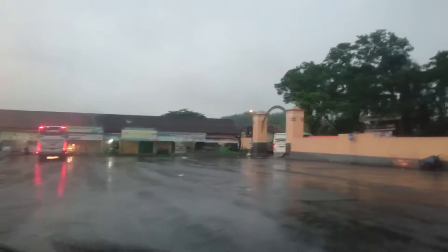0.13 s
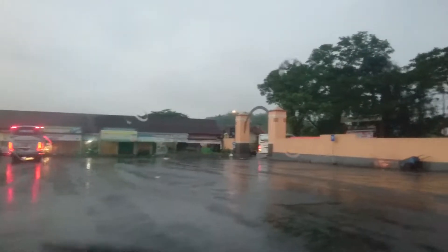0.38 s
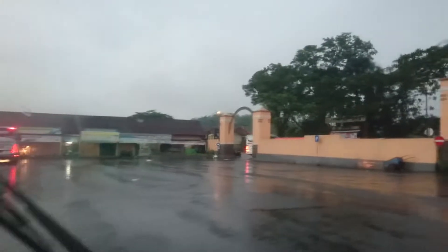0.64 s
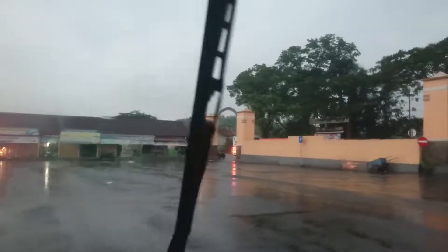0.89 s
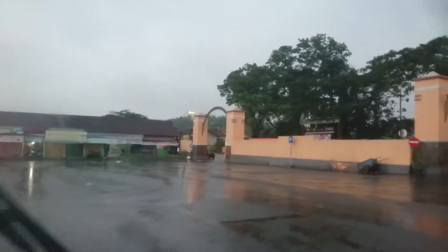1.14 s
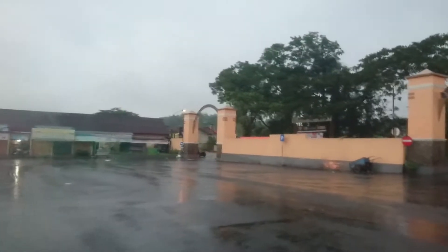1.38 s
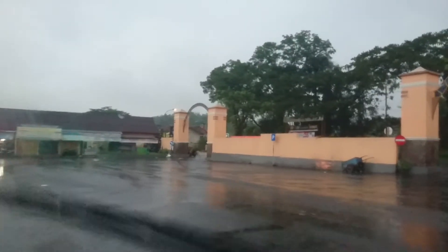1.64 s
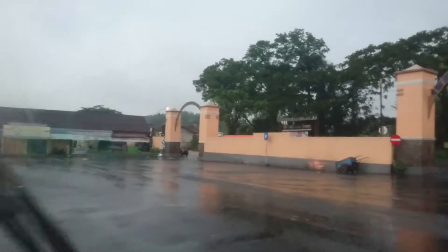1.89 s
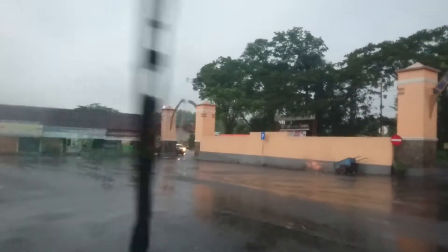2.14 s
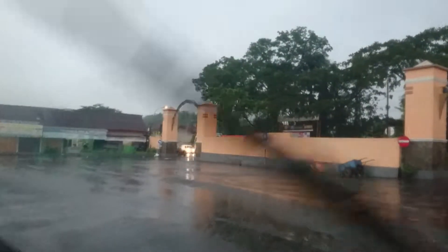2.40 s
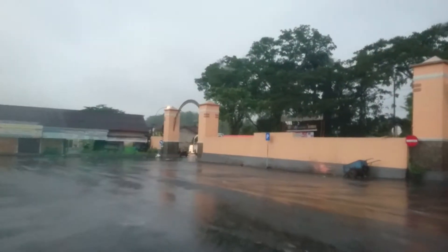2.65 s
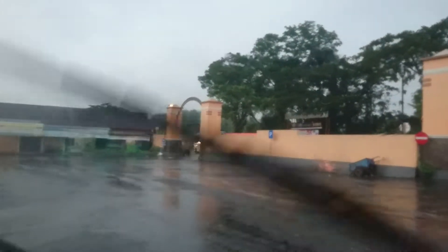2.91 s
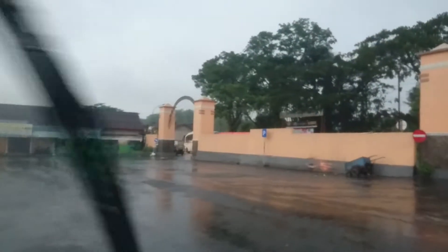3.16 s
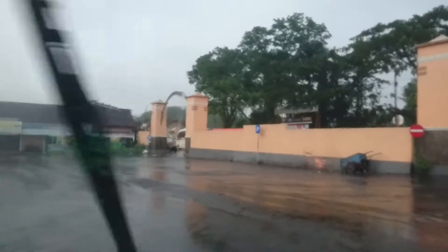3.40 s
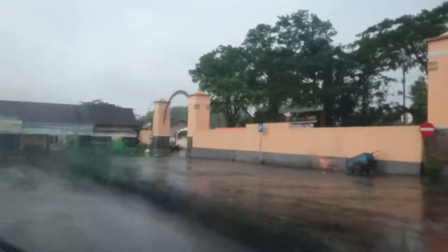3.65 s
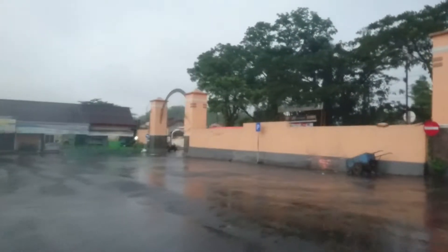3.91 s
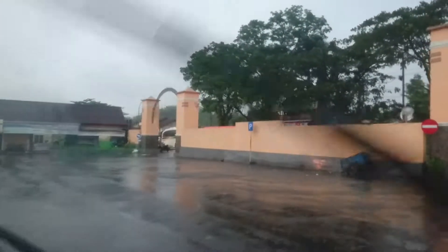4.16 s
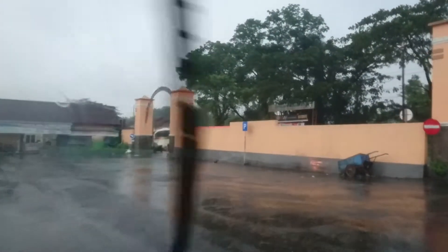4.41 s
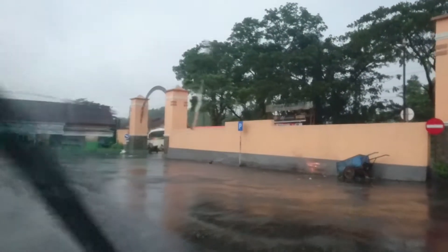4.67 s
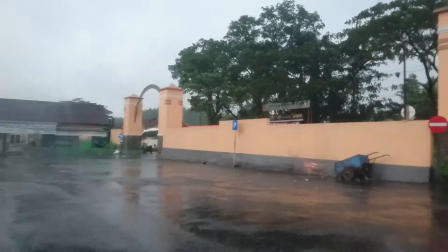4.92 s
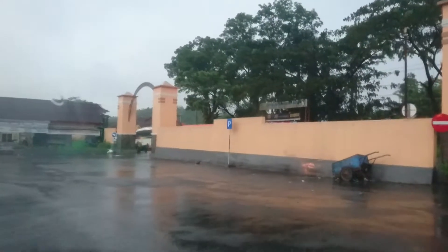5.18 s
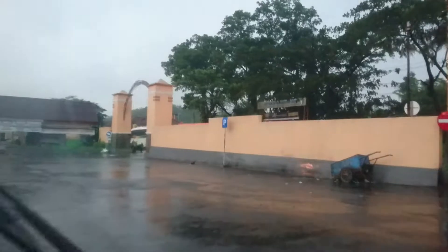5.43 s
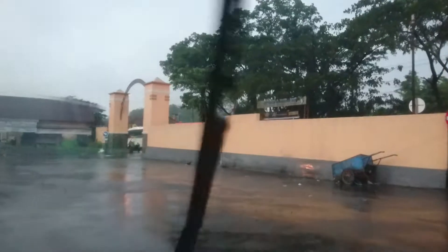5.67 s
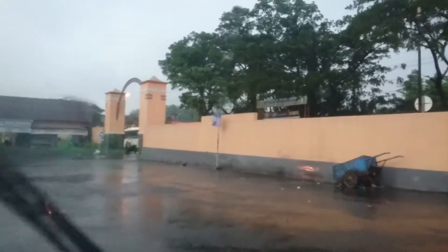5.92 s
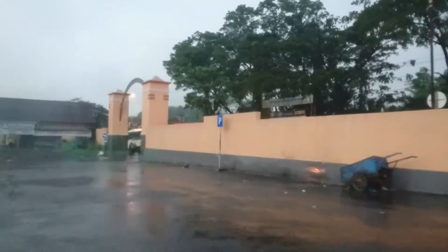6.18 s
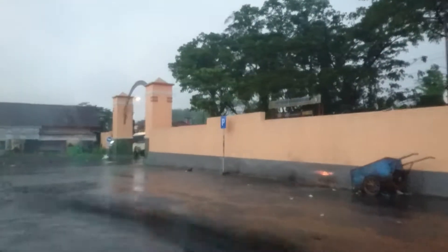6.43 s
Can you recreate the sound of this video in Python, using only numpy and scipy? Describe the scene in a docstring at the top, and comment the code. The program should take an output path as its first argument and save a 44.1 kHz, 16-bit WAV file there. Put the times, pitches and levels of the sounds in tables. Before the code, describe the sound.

A phone inside a car picks up bass-heavy rumble, swelling in irregular surges, and fine steady rain behind it. Wiper blades go back and forth about every 1.2 seconds, landing with dull thuds and light rubber stutters. The engine pulls gently at first and drops away. Later come thin, broken brake squeals, mostly on the left, a heavier thud and scattered drop ticks, then rumble, rain and wipers continue to the end.

```python
"""Heavy rain hisses on a slowly rolling car; the cabin booms, the wipers thump, the brakes squeal faintly.
Heard inside by a phone with two microphone ports. Boom, engine and hums are wandering tones; rumble is coloured
noise; rain is noise with uneven drops, coloured by each port. Wiper strokes ring decaying modes of the screen;
spray, splashes and drips are noise bursts, the squeal two smeared notes, the phone's whine steady sines."""
import sys
import numpy as np
from scipy import signal
from scipy.fft import rfft, irfft
from scipy.io import wavfile
from scipy.ndimage import uniform_filter1d

SR = 44100
rng = np.random.default_rng(int(sys.argv[2]) if len(sys.argv) > 2 else 0)


def waveform_to_disk(signal):
    """Save audio, clipped to [-1, 1], as 16-bit WAV at the path in sys.argv[1]."""
    frames = np.transpose(np.atleast_2d(signal))
    scaled = np.clip(frames, -1, 1) * 32767
    samples = np.round(scaled).astype(np.int16)
    wavfile.write(sys.argv[1], SR, samples)


def gain_from_db(level_db):
    """Turn a decibel level (scalar or array-like) into a linear amplitude factor."""
    decades = np.asarray(level_db, float) / 20
    return 10 ** decades


N = 289296
T = np.arange(N) / SR

# Cabin boom. Each row: time in seconds, relative level in dB.
BOOM_LEVEL = [(0.0, -27), (0.78, -33), (0.8, -25), (1.08, -25), (1.15, -38), (1.33, -16.5), (1.37, -27.5),
              (2.28, -27.5), (2.37, -49), (2.43, -23), (3.32, -30), (3.42, -47), (3.49, -25), (3.71, -37.5),
              (3.96, -18.5), (4.02, -33), (4.07, -16), (4.2, -31), (5.08, -30), (5.15, -51), (5.21, -24),
              (6.41, -29.5), (6.52, -23.5), (6.56, -24.5)]
# Boom pitch. Each row: time in seconds, centre pitch in Hz.
BOOM_PITCH = [(0.0, 47.87), (0.69, 60.38), (1.2, 54.47), (4.77, 55.55), (4.8, 59.92), (6.12, 49.59),
              (6.23, 57.95), (6.56, 57.84)]
# Body and rain. Each row: time in seconds, body rumble in dB, relative rain level in dB.
RIDE = [(0.0, -35, -55), (0.5, -34, -55), (0.8, -28.5, -54.5), (1.6, -29, -54), (2.15, -28.5, -52.5),
        (2.76, -31, -53.5), (3.6, -31.5, -54.5), (4.3, -31, -53.5), (4.9, -33, -54), (5.7, -32.5, -54.5),
        (6.56, -32, -51.5)]
# Body rumble spectrum. Each row: frequency in Hz, relative density in dB.
BODY_SPECTRUM = [(38, -20), (65, -2), (84, -5.5), (151, -12.5), (200, -13), (366, -28.5), (1100, -52.5),
                 (1430, -88), (2420, -120)]
# Engine note, rising while the car pulls. Each row: time in seconds, pitch in Hz, level in dB.
ENGINE = [(0.6, 111.4, -45), (1.0, 114, -36), (1.6, 120, -37.5), (2.2, 126.9, -33.5), (2.4, 125.3, -51)]
# Dull thuds through the body. Each row: start in seconds, level in dB.
THUDS = [(0.72, -27.5), (4.37, -21.5), (5.58, -26)]
# Likeness of the rain at both ports. Each row: frequency in Hz, correlation from -1 to 1.
LIKENESS = [(500, 0.65), (850, -0.45), (1300, -0.31), (2300, -0.056), (3000, 0.044)]
# Rain through each port. Each row: frequency in Hz, relative left response in dB, right in dB.
PORT_RESPONSE = [(500, -11.5, -12.5), (945, -7, -5), (1610, -9.5, -5), (2460, -13.5, -7.5),
                 (4400, -10.5, -5.5), (5760, -12, -3), (6580, -15, 1), (6680, -12, -2), (7880, -22.5, -21),
                 (8950, -10.5, -25), (9900, -21, -24.5), (12200, -28.5, -29), (13900, -28, -27),
                 (15500, -44, -24.5)]
# Stray splashes on the glass. Each row: start in seconds, relative level in dB, length in seconds.
SPLASHES = [(0.903, -56.5, 0.045), (1.116, -56.5, 0.045), (1.176, -56, 0.04), (1.41, -54, 0.031),
            (1.458, -59, 0.04), (2.102, -56, 0.03), (3.704, -59.5, 0.13), (5.747, -54, 0.035)]
# Electric whine. Each row: pitch in Hz, left level in dB, right level in dB.
WHINE = [(7200.5, -90, -70), (9600.7, -83, -74.5), (12000.9, -90, -89), (14000, -96, -96)]
# Wiper motor hum. Each row: time into the sweep in seconds, mean level in dB.
MOTOR = [(0, -71), (.3, -66), (.4, -73), (.75, -74), (.95, -66.5), (1.2, -72)]
# Windscreen and wiper arm modes. Each row: nominal pitch in Hz, relative level in dB, t60 in seconds.
SCREEN_MODES = [(105.2, -11.5, 0.2), (199.4, 0.5, 0.097), (280.6, -1, 0.07), (311.4, -1, 0.06),
                (453, 0.5, 0.07), (600, -2, 0.018), (673, -16, 0.043), (935, -12, 0.022),
                (1030, -11, 0.012), (1450, -26, 0.03)]
# Arm turns, at the same times in every sweep, their thump levels scattered a little. Each row: time into
# the sweep in seconds, mean relative thump level in dB, relative snap level in dB, judder length in seconds.
TURNS = [(0.303, -20, -55.5, 0.053), (0.933, -19.5, -55, 0.02), (0.968, -29, -51, 0.08)]
# Blade flips. Each row: start in seconds, relative thump, snap and spray levels in dB.
FLIPS = [(0.438, -27.5, -46, -71), (0.765, -19.5, -36, -56.5), (1.638, -26, -45.5, -68),
         (1.98, -19, -35.5, -52), (2.84, -27.5, -46.5, -75), (3.178, -20, -35.5, -54),
         (4.01, -31, -46, -79), (4.366, -16.5, -41, -55), (5.231, -27, -46.5, -63),
         (5.574, -21.5, -39, -57), (6.419, -28, -52, -67)]
# Large single drops. Each row: start in seconds, relative level in dB, centre in Hz, band width in Hz,
# length in seconds.
DRIPS = [(0.751, -41.5, 5600, 1300, 0.0078), (3.954, -51, 6600, 1200, 0.011), (4.346, -50, 5950, 1400, .01),
         (4.713, -52.5, 5400, 600, 0.015), (4.777, -50, 2950, 190, 0.007)]
# Two notes of the brake squeal. Each row: time in seconds, centre pitch in Hz, relative level in dB.
SQUEALS = [
    [(3.12, 7740, -95), (3.17, 7740, -78), (3.24, 7750, -71), (3.31, 7760, -70), (3.345, 7760, -84),
     (3.385, 7770, -72), (3.445, 7820, -69), (3.47, 7990, -77), (3.6, 8000, -76), (3.8, 7970, -72.5),
     (3.95, 7960, -76), (4.05, 7980, -79), (4.45, 8050, -75.5), (4.6, 8050, -95)],
    [(4.1, 8830, -95), (4.2, 8820, -68), (4.26, 8815, -61), (4.34, 8820, -72), (4.52, 8830, -76),
     (4.75, 8820, -88)],
]

SWEEP_S = 1.2011
SNAP_FROM_HZ = 400  # splits the screen modes into thump and snap


def unit(x):
    """Scale to rms 1."""
    return x / np.sqrt(np.mean(x ** 2))


def noise(*shape):
    """White noise of rms near 1."""
    return rng.standard_normal((*shape, N))


def at_ports(left_db, right_db):
    """Gains of the left and right port."""
    return gain_from_db([[left_db], [right_db]])


def curve(rows):
    """Columns of a (time in seconds, value, ..) table, sample by sample."""
    s, *columns = np.transpose(rows)
    return [np.interp(T, s, c) for c in columns]


def walk(rate_hz):
    """Random levels held 1 / rate_hz seconds and slewed twice; spread near 1."""
    k = int(SR / rate_hz)
    held = np.repeat(rng.standard_normal(N // k + 1), k)
    return 1.286 * uniform_filter1d(uniform_filter1d(held, k), k)[:N]


def colour(x, hz, db):
    """Shape a sound by a (Hz, dB) spectrum that falls away beyond its ends."""
    log_f = np.log(np.fft.rfftfreq(N, 1 / SR) + 1)
    log_hz = np.log(np.r_[hz[0] / 1.3, hz, hz[-1] * 1.3])
    gain_db = np.interp(log_f, log_hz, np.r_[db[0] - 50, db, db[-1] - 90])
    return irfft(rfft(x) * gain_from_db(gain_db), N)


def tone(hz, wobble_hz, rate_hz):
    """A sine of rms 1 whose pitch wanders."""
    return np.sqrt(2) * np.sin(2 * np.pi * np.cumsum(hz + wobble_hz * walk(rate_hz)) / SR)


def bursts(s, db, length_s):
    """Envelope of soft events that swell fast and die away over their length."""
    out = np.zeros(N)
    starts = (s * SR).astype(int)
    sizes = (np.clip(length_s, .002, .6) * SR).astype(int)
    for start, gain, k in zip(starts, gain_from_db(db), sizes):
        u = np.arange(k) / k
        out[start:start + k] += gain * np.sin(np.pi * u ** 0.68) ** 2
    return out


def ring(x, modes):
    """Excite a set of exponentially decaying modes, their joint response scaled to peak 1."""
    t = T[:SR // 4]
    response = sum(gain_from_db(db) * np.sin(2 * np.pi * hz * t) * np.exp(-np.log(1000) * t / t60_s)
                   for hz, db, t60_s in modes)
    return signal.fftconvolve(x, response / np.abs(response).max())[:N]


def patches(x, slow_db, quick_db):
    """Let each half-octave of a sound drift with its neighbours and flicker alone."""
    spectrum = rfft(x)
    half_octave = 2 * np.log2(np.clip(np.fft.rfftfreq(N, 1 / SR), 500, 16000) / 500)
    drift = uniform_filter1d([walk(4) for _ in range(11)], size=3, axis=0) * np.sqrt(3)
    out = 0
    for k in range(11):
        band = irfft(spectrum * np.clip(1 - np.abs(half_octave - k), 0, 1), N)
        out = out + band * gain_from_db(slow_db * drift[k] + quick_db * walk(14))
    return out


def boom():
    """One air mode of the cabin: a wandering tone plus narrow noise, swelling in surges."""
    sway = unit(colour(noise(), [33, 42, 66], [-14, 0, -8]))
    surge_db = curve(BOOM_LEVEL)[0] + 1.5 * walk(14)
    return gain_from_db(surge_db - 1.0) * (tone(curve(BOOM_PITCH)[0], 3.6, 12) + 0.4 * sway)


def rumble():
    """Body panels as coloured noise: shared bass, shared upper part, and each port's own part."""
    body_db = curve(RIDE)[0]
    hz, db = np.transpose(BODY_SPECTRUM)
    whole = unit(colour(noise(), hz, db))
    low = colour(whole, [20, 140, 180], [0, 0, -40])
    bass = gain_from_db(body_db + 0.81 * walk(5.4)) * unit(low)
    upper_db = -41.5 + 0.64 * (body_db - body_db.mean()) + 1.2 * walk(9)
    upper = gain_from_db(upper_db) * unit(whole - low)
    own_spectrum_db = db - np.interp(hz, [150, 900], [15, 0])
    own = gain_from_db(-45.5) * unit(colour(noise(2), hz, own_spectrum_db))
    return bass, upper, own


def engine():
    """A wandering engine note comes through the body."""
    hz, db = curve(ENGINE)
    return gain_from_db(db + 0.7 * walk(18)) * tone(hz, 0.83, 8.5)


def thuds():
    """Short bursts of a low body tone."""
    s, db = np.transpose(THUDS)
    return bursts(s, db, np.full(len(s), 0.11)) * tone(99, 2.67, 20)


def panel_hum():
    """A floor panel hums at a wandering pitch and level."""
    return gain_from_db(-49.5 + 5 * walk(7)) * tone(192, 6, 14)


def cabin():
    """Boom, rumble, engine, thuds and panel hum, each with its balance between the ports."""
    bass, upper, own = rumble()
    floor = bass + engine() + thuds() + panel_hum()
    return boom() * at_ports(-.6, .6) + floor * at_ports(-1.6, 1.6) + upper * at_ports(-3.1, 2.4) + own


def patter():
    """Some 1500 uneven drops a second over a smooth wash, drifting and flickering by bands."""
    drop_db = np.minimum(2.5 * rng.exponential(size=(2, N)), 8)
    drops = (rng.random((2, N)) < 1500 / SR) * noise(2) * gain_from_db(drop_db)
    wash = patches(noise(2) + 0.45 * unit(drops), slow_db=.3, quick_db=.9)
    gusts_db = .6 * np.array([walk(16), walk(16)])
    return gain_from_db(curve(RIDE)[1] + 2.0 + gusts_db) * unit(wash)


def spray():
    """Water thrown around each flip, and stray splashes: bursts of bright noise."""
    s, _, _, db = np.transpose(FLIPS)
    thrown = bursts(s - .025, db, np.full(len(s), .085)) * gain_from_db(2 * walk(70))
    splash = thrown + bursts(*np.transpose(SPLASHES))
    return splash * [unit(colour(v, [900, 5500, 12000], [-13, 0, -10])) for v in noise(2)]


def rain():
    """Patter and spray, correlated between the ports by frequency and coloured by each port."""
    water = patter() + spray()
    # across the phone body the middle band arrives in opposite phase
    left, other = rfft(water)
    like = np.clip(np.interp(np.fft.rfftfreq(N, 1 / SR), *np.transpose(LIKENESS)), -1, 1)
    water[1] = irfft(like * left + np.sqrt(1 - like ** 2) * other, N)
    hz, *responses_db = np.transpose(PORT_RESPONSE)
    heard = np.array([colour(w, hz, db) for w, db in zip(water, responses_db)])
    return heard * np.std(water) / np.std(heard)


def whine():
    """Steady thin tones from the phone's own circuits."""
    return sum(at_ports(left_db, right_db) * np.sqrt(2) * np.sin(2 * np.pi * hz * T)
               for hz, left_db, right_db in WHINE)


def motor():
    """The wiper motor hums, its level following the sweep."""
    db = np.interp(T % SWEEP_S, *np.transpose(MOTOR))
    return gain_from_db(db + 3 * walk(25)) * tone(677, 9, 90)


def strokes():
    """Turns repeat once a sweep with scattered thump levels; flips judder longer the harder they land."""
    turns = np.array([(s + k * SWEEP_S, *rest) for k in range(6) for s, *rest in TURNS])
    turns[:, 1] += 1.0 * rng.standard_normal(len(turns))
    s, db, snap_db, _ = np.transpose(FLIPS)
    judder_s = .052 + .001 * (db + 24.5)
    flips = np.transpose([s, db, snap_db, judder_s])
    return np.vstack([turns[turns[:, 0] < T[-1] - .1], flips]).T


def shudder():
    """The arms shudder after the lower turn: a wavering tone burst in each of five sweeps."""
    s = .93 + SWEEP_S * np.arange(5)
    envelope = bursts(s, np.full(5, -33.5), np.full(5, 0.14))
    return envelope * gain_from_db(1.5 * walk(40)) * tone(196.1, 8, 30)


def thump(s, db, judder_s, slips):
    """A soft blow, its rebound and a judder of rubber on glass ring the low modes."""
    contact_s = np.full(len(s), .004)
    # the arm rebounds and lands a second time, much weaker when the judder is short
    rebound_db = db - 34.0 - 15 * (judder_s < .03)
    blows = bursts(s, db - 30.5, contact_s) - bursts(s + 0.024, rebound_db, contact_s)
    force = blows + bursts(s, db - 22, judder_s) * slips
    # the modes shift with the place of the blade, drawn for each stroke
    stroke = np.clip(np.searchsorted(np.sort(s), T) - 1, 0, None)
    place = rng.integers(-1, 2, len(s))[stroke]
    low = 0
    for k in range(-1, 2):
        modes = [(hz * (1 + .05 * k), *rest) for hz, *rest in SCREEN_MODES if hz < SNAP_FROM_HZ]
        low = low + ring(force * (place == k), modes)
    # soft rubber puts little above the lowest modes
    return signal.sosfilt(signal.butter(N=4, Wn=380, fs=SR, output="sos"), low)


def snap(s, db, judder_s, slips):
    """Rough slips and two later knocks ring the higher modes, partly apart at each port."""
    rough = bursts(s - .019, db - 11, 1.6 * judder_s) * gain_from_db(2.5 * walk(70))
    knock_s = np.full(len(s), .002)
    knock = bursts(s + .012, db - 21, knock_s) + bursts(s + .027, db - 23, knock_s)
    modes = [m for m in SCREEN_MODES if m[0] > SNAP_FROM_HZ]
    high = np.array([ring(knock + rough * (slips[0] + 1.74 * own), modes) for own in slips[1:]])
    return signal.sosfilt(signal.butter(N=2, Wn=1500, fs=SR, output="sos"), high)


def wipers():
    """Motor hum, and a thump and snap at each stroke driven by random slips of the rubber."""
    s, db, snap_db, judder_s = strokes()
    slips = (rng.random((3, N)) < 1500 / SR) * noise(3)
    low = thump(s, db, judder_s, slips[0]) + shudder()
    high = snap(s, snap_db, judder_s, slips)
    return low * at_ports(-3.1, 2.4) + (high + motor()) * at_ports(-2.1, 1.9)


def drips():
    """Large drops tick on the glass, each a noise burst in its own band, nearer the right port."""
    ticks = np.zeros(N)
    for s, db, hz, width_hz, length_s in DRIPS:
        band_hz = hz + width_hz * np.arange(-1.5, 2)
        band = unit(colour(noise(), band_hz, [-30, 2, -2, -30]))
        ticks += bursts(*np.array([[s], [db], [length_s]])) * band
    return ticks * at_ports(-8, 2.5)


def squeal():
    """A pad sings against the disc in two broken notes that mostly reach the left port."""
    # uneven grip smears a note into a narrow band, the more so the fainter it sings
    k = SR // 250
    grip = unit(uniform_filter1d(uniform_filter1d(noise(), k), k))
    notes = 0
    for hz, db in map(curve, SQUEALS):
        steadiness = np.clip((db + 78) / 4, 0, 2)
        notes = notes + gain_from_db(db) * tone(hz, 25, 90) * (grip + steadiness) / 2
    return gain_from_db(1.5 * walk(25)) * notes * at_ports(5.5, -12)


def scene():
    """All sources at the two ports."""
    return cabin() + rain() + whine() + wipers() + drips() + squeal()


def low_pass(x):
    """Removes everything above the highest recorded frequency."""
    return signal.sosfilt(signal.butter(12, 15620, fs=SR, output="sos"), x)


def record(dry):
    """The phone stores the sound of its two ports."""
    return low_pass(dry)


dry = scene()
out = record(dry)
waveform_to_disk(out)
```